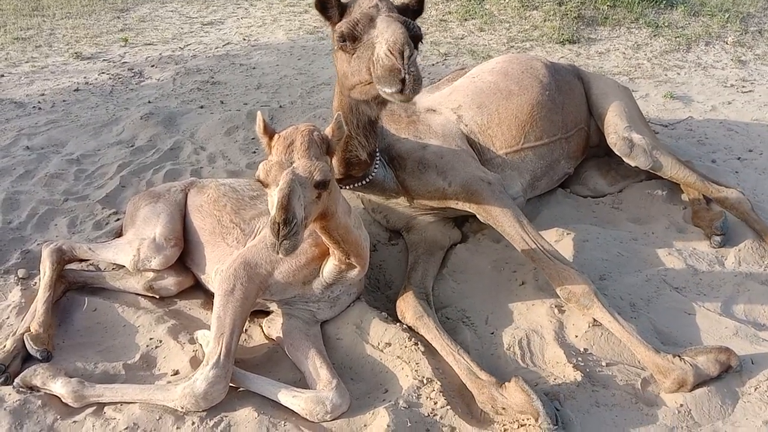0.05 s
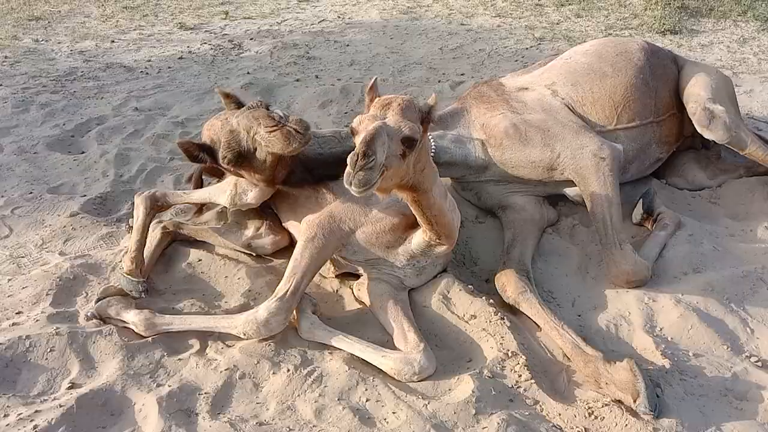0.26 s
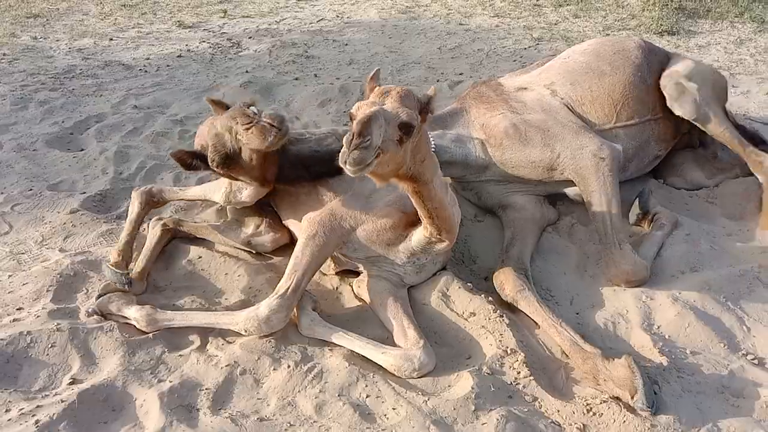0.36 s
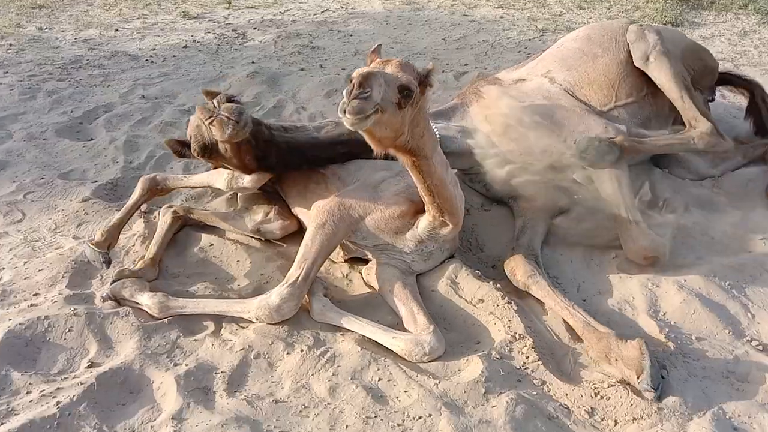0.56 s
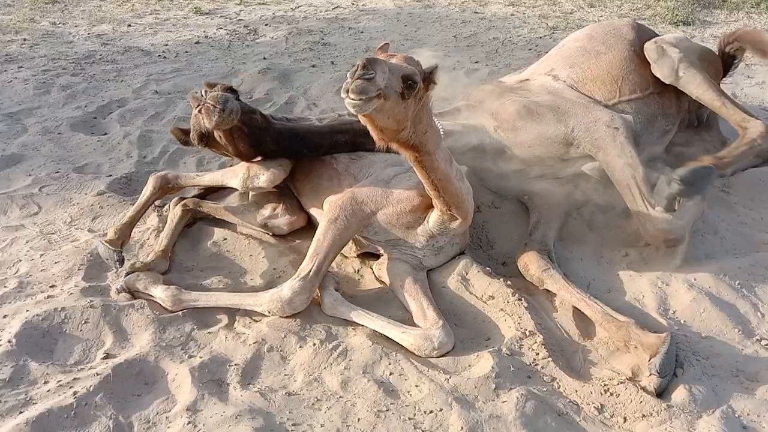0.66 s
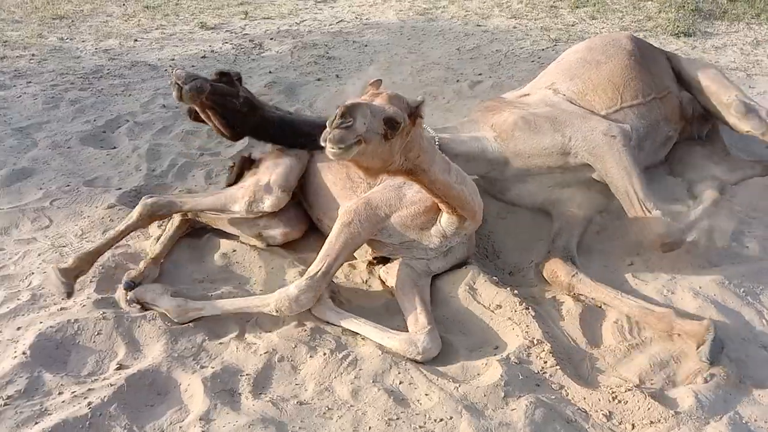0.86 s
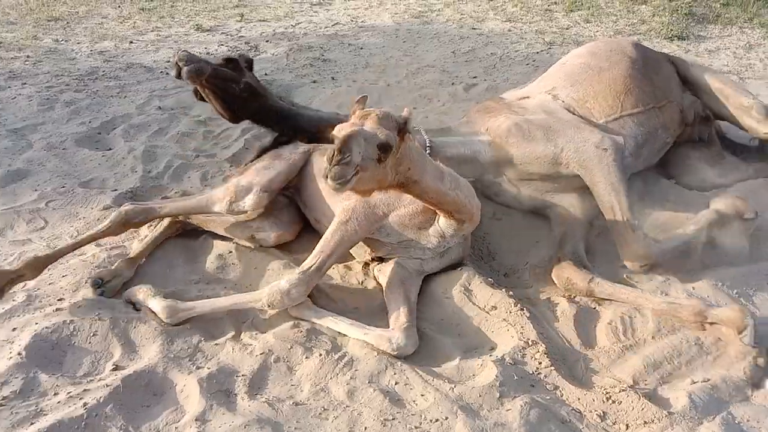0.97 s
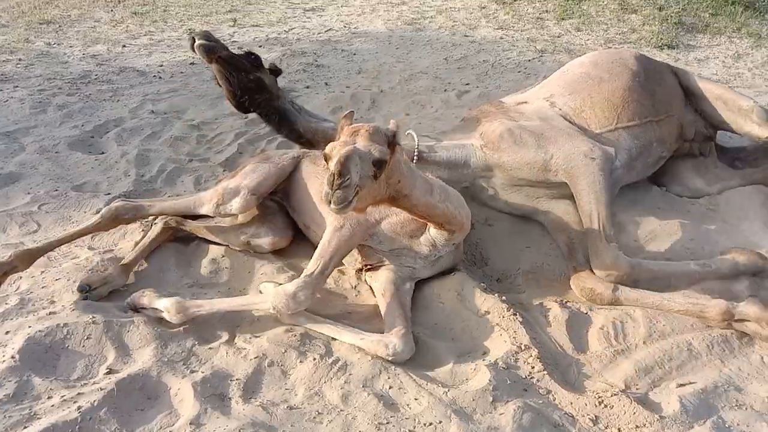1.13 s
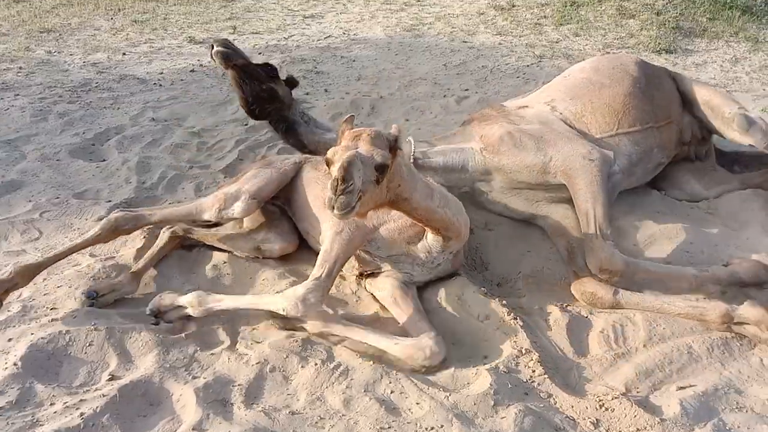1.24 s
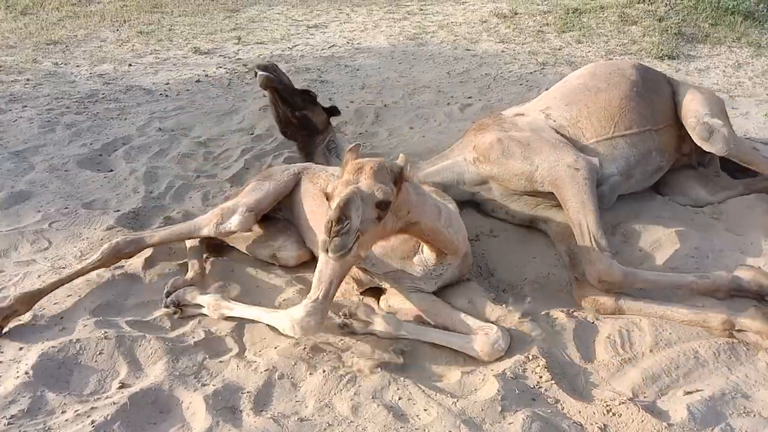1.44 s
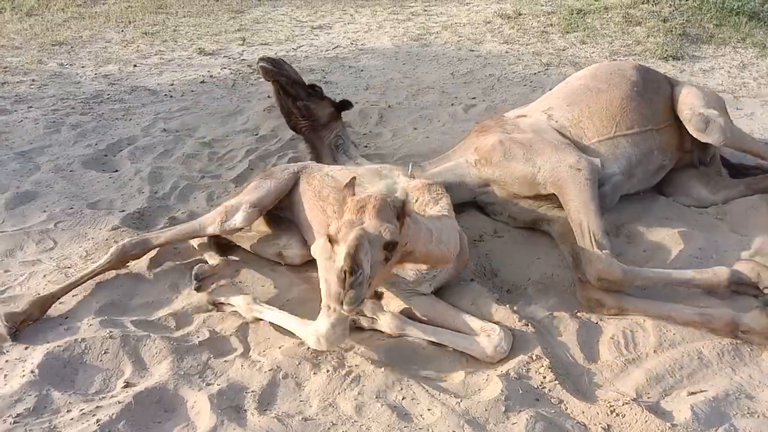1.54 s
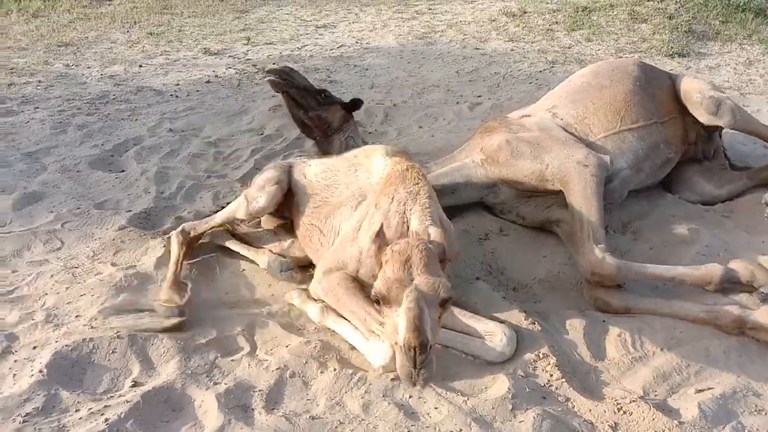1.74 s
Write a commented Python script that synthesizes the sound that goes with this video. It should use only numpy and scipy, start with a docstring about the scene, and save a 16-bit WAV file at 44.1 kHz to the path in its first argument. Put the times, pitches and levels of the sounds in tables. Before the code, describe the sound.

A camel gives three quick, hoarse grunts, the first two joined by a soft moan and the last the loudest. Its body and legs then thump dully on the ground, with light swishes of sand in quiet open air.

```python
"""On open sand, a rolling camel gives three hoarse grunts, the first two joined by a soft moan.
Its vocal folds (the flaps in its throat) chop the breath into uneven puffs, which ring in the
throat and mouth as a low voice and a bright rasp. Its body and legs thump and rumble on the ground,
its hide drags and kicked sand swishes. Faint chirps and a quiet hiss of air lie behind."""
import sys
import numpy as np
from scipy import signal
from scipy.fft import rfft, irfft, next_fast_len
from scipy.io import wavfile
from scipy.ndimage import uniform_filter1d, map_coordinates

SR = 44100
rng = np.random.default_rng(int(sys.argv[2]) if len(sys.argv) > 2 else 0)


def inscribe(sig):
    """Save sig as 16-bit PCM at rate SR to the path in sys.argv[1].

    A 1-D sig is mono; a 2-D sig holds one channel per row.
    Samples are clipped to [-1, 1] before scaling.
    """
    pcm = np.round(np.clip(np.atleast_2d(sig).T, -1, 1) * 32767)
    wavfile.write(sys.argv[1], SR, pcm.astype(np.int16))


N = 79380
T = np.arange(N) / SR
FFT_SIZE = next_fast_len(N + 8192, True)
HZ = np.fft.rfftfreq(FFT_SIZE, 1 / SR)


def grunts():
    """Puffs of breath ring a low throat and a bright, fluttering rasp, with a thin whistle."""
    # how the vocal folds vibrate (time [s], pitch [Hz], roughness [0-1])
    folds = [(0, 134.5, .7), (.2, 139.4, 0.7), (.3, 136.1, 1), (.355, 145.8, 0.47), (.38, 146.5, 0.34),
             (.42, 139.7, 0.37), (.45, 126.5, 0.47), (.52, 132, 0.7), (.565, 129.9, .4), (.68, 108.4, 0.53),
             (.76, 106.4, 0.67), (.82, 102.9, 0.57)]
    # loudness of the low voice and of the rasp (time [s], level [dB])
    throat_levels = [(.18, -81), (.196, -65), (.2, -35.5), (.27, -32.5), (.352, -31.5), (.375, -52),
                     (.425, -47.5), (.45, -31), (.515, -28), (.552, -30.5), (.568, -46), (.6, -83),
                     (.66, -66), (.675, -39.5), (.71, -25.5), (.752, -23.5), (.78, -23.5), (.8, -39),
                     (.82, -51.5), (.86, -64)]
    rasp_levels = [(.18, -90), (.197, -68), (.199, -38), (.26, -30), (.298, -33), (.31, -25.5),
                   (.335, -33.5), (.357, -35), (.38, -47.5), (.438, -46.5), (.447, -33.5), (.476, -30),
                   (.524, -33), (.542, -26), (.555, -32.5), (.575, -55.5), (.66, -77), (.672, -47),
                   (.675, -29.5), (.682, -43), (.692, -41), (.696, -25), (.71, -18.5), (.732, -20.5),
                   (.757, -17), (.781, -19), (.786, -25), (.801, -34), (.816, -41), (.835, -59.5),
                   (.95, -76), (1.1, -100)]
    # where grunts 1, 2 and 3 ring, low and high (frequency [Hz], width [Hz], level [dB])
    low_1 = [(297, 231, 9), (720, 170, -7.5), (890, 173, 8), (1123, 210, 1.5), (1460, 440, -9)]
    low_2 = [(246, 121, -0.5), (398, 105, -10), (705, 84, -11.5), (922, 144, 0.5), (1083, 150, -10.5),
             (1417, 260, -21)]
    low_3 = [(240, 60, -1.5), (326, 140, -7), (702, 140, -15.5), (973, 150, -1), (1122, 33, -11.5),
             (1259, 50, -9), (1463, 140, -19.5)]
    high_1 = [(1812, 51, -9.5), (2260, 336, -4.5), (2670, 130, -5), (3195, 630, -7.5), (4600, 320, -5),
              (5210, 420, -9.5), (5950, 320, -17), (6610, 440, -24)]
    high_2 = [(2110, 440, -14.5), (2607, 314, -2.5), (3178, 350, -3), (4265, 400, -13), (4370, 230, -14),
              (4830, 500, -14), (6060, 330, -21), (7000, 84, -29)]
    high_3 = [(2030, 150, -16.5), (2413, 272, 1.5), (2840, 300, -13), (3126, 180, -2.5), (3400, 160, -16),
              (4013, 280, -13.5), (4627, 510, -13.5), (5585, 440, -24.5), (6400, 450, -30),
              (7180, 890, -47.5)]
    top = [(8210, 900, -52), (9964, 620, -50)]  # weak treble rings shared by all three
    pitch, rough = curves(folds)
    puffs, bursts = fold_puffs(pitch, rough)
    throat = mouth(breath(puffs, bursts, noise_share=0.46 * rough), [low_1, low_2, low_3])
    throat *= amp(curves(throat_levels)[0])
    rasp_shapes = [list(rows) + list(top) for rows in (high_1, high_2, high_3)]
    rasp = mouth(breath(puffs, bursts, noise_share=1.5 * rough), rasp_shapes)
    flutter_db = 2.5 * rough * wobble(125.3)
    rasp *= amp(curves(rasp_levels)[0] + flutter_db)
    fade_out = np.clip((.95 - T) / 0.16, 0, 1)
    return (throat + whistle()) * fade_out + rasp


def fold_puffs(pitch, rough):
    """The folds let out one puff a cycle; a rougher voice has less even timing and strength."""
    starts = np.flatnonzero(np.diff(np.floor(np.cumsum(pitch) / SR)))
    chance = rng.standard_normal((len(starts), 2))
    slip = chance[:, 0] * .14 * rough[starts] * SR / pitch[starts]
    strength_db = 2 * rough[starts] * chance[:, 1]
    puffs = np.bincount(np.clip(starts + slip, 0, N - 1).astype(int), amp(strength_db), N)
    # each puff starts a burst that dies away over about one cycle
    bursts = signal.lfilter([1], [1, -np.exp(-0.98 * pitch.mean() / SR)], puffs)
    return puffs, bursts


def breath(puffs, bursts, noise_share):
    """Clean puffs mixed with the hiss of swirling air that follows each, plus close echoes."""
    share = np.clip(noise_share, 0, 1)
    hiss = unit(bursts * rng.standard_normal(N))
    return close_echoes(np.sqrt(1 - share) * unit(puffs) + np.sqrt(share) * hiss)


def mouth(source, shapes):
    """The mouth takes a new shape for each grunt, so different frequencies ring."""
    # moments when the mouth changes shape (time [s])
    changes = [0.414, .63]
    shape_now = sum(np.clip((T - s) / 0.045 + .5, 0, 1) for s in changes)
    out = np.zeros(N)
    for k, rows in enumerate(shapes):
        weight = np.clip(1 - np.abs(shape_now - k), 0, 1)
        out += weight * unit(filtered(source, resonances(rows)))
    return steady(out)


def whistle():
    """A thin, unsteady whistle in the throat during the last two grunts."""
    # path of the whistle (time [s], pitch [Hz], level [dB])
    path = [(.41, 1340, -89), (.445, 1350, -43), (.49, 1410, -53.5), (.53, 1452, -40), (.575, 1426, -49.5),
            (.61, 1400, -96.5), (.68, 1392, -71), (.76, 1495, -43.5), (.8, 1425, -44), (.84, 1410, -77.5)]
    hz, db = curves(path)
    level = np.sqrt(2) * amp(db + 3.4 * wobble(120))
    cycles = np.cumsum(hz * (1 + 0.0031 * wobble(150))) / SR
    return level * np.sin(2 * np.pi * cycles)


def moan():
    """A soft, clean voice made of harmonics: tones at 1, 2, 3... times the pitch."""
    # path of the moan (time [s], pitch [Hz], level [dB])
    path = [(.29, 149.6, -55), (.345, 149.9, -38.5), (.38, 146.6, -39), (.405, 144.6, -44),
            (.425, 137, -42.5), (.45, 132, -53), (.48, 131, -74)]
    # strength of each harmonic, lowest first (relative level [dB])
    harmonics = [-14.5, -7.5, -18, -45, -16, -3, -10.5, -15, -23, -29]
    hz, db = curves(path)
    cycles = np.cumsum(hz) / SR
    tone = sum(amp(level) * np.sin(2 * np.pi * (k * cycles + rng.random()))
               for k, level in enumerate(harmonics, 1))
    return unit(tone) * amp(db) * (T > path[0][0]) * (T < path[-1][0])


def squeal(width_hz=950):
    """Swirling air rings brightly in the first grunt and falls in pitch as the mouth opens."""
    # path of the ring (time [s], frequency [Hz], level [dB])
    path = [(.197, 6000, -58), (.2, 6000, -52), (.222, 5900, -42), (.24, 5250, -40.5), (.26, 4510, -31),
            (.29, 4420, -42), (.325, 4460, -30.5), (.36, 4250, -73), (.38, 4350, -78)]
    hz, db = curves(path)
    band = wobble(width_hz) + 1j * wobble(width_hz)
    hiss = np.real(band * np.exp(2j * np.pi * np.cumsum(hz) / SR))  # moves the noise up to hz
    return steady(hiss) * amp(db) * (T > path[0][0]) * (T < path[-1][0])


def whine():
    """Thin air rings faintly in the throat before the first grunt."""
    # loudness of the whine (time [s], level [dB])
    levels = [(0, -75), (.04, -55.5), (.09, -65.5), (.135, -55.5), (.19, -63.5), (.23, -90)]
    # where the throat rings (frequency [Hz], width [Hz], level [dB])
    rings = [(950, 89, 1), (2600, 300, -17), (3320, 480, -28), (4850, 290, -31), (5500, 300, -34)]
    return steady(noise(resonances(rings))) * amp(curves(levels)[0])


def body():
    """The shifting body makes the ground rumble and lands in heavy bumps a cycle or two long."""
    # tone of the ground (frequency [Hz], relative level [dB])
    ground = [(20, -20), (45, -15), (75, 7), (150, -2), (230, -8.5), (350, -21), (500, -40.5), (750, -50.5),
              (1400, -61), (4000, -89)]
    # loudness of the rumble (time [s], level [dB])
    rumble = [(0, -56), (.09, -39.5), (.25, -47), (.33, -36.5), (.42, -56), (.56, -51), (.6, -41),
              (.75, -36), (.82, -40.5), (.97, -43), (1.08, -34), (1.15, -44), (1.24, -28), (1.31, -32.5),
              (1.45, -32), (1.52, -35), (1.6, -25.5), (1.665, -45)]
    # body and legs hitting the ground (time [s], level [dB], pitch [Hz])
    thumps = [(0.101, -38, 69), (0.161, -34.5, 79.5), (0.296, -22, 136), (0.686, -16.5, 138),
              (0.915, -18, 107), (0.932, -25, 188), (1.025, -21.5, 156.4), (1.093, -20.5, 178.4),
              (1.114, -23.5, 70), (1.238, -23, 165), (1.254, -22.5, 127.7), (1.335, -13, 171),
              (1.35, -23, 155), (1.411, -18.5, 130), (1.423, -14.5, 107), (1.464, -17, 143.5),
              (1.486, -20.5, 111), (1.555, -22, 133), (1.587, -21.5, 188.5), (1.609, -29, 130)]
    rise_cycles, fall_cycles = 0.44, 0.58
    out = steady(noise(colour(ground))) * amp(curves(rumble)[0] + 1.5 * wobble(30))
    for s, db, hz in thumps:
        cycles = (T - s) * hz
        bump = np.exp(-.5 * (cycles / np.where(cycles < 0, rise_cycles, fall_cycles)) ** 2)
        overtone = amp(-13) * bump ** 2 * np.cos(2 * np.pi * (1.91 * cycles + rng.random()))
        out += amp(db) * (bump * np.cos(2 * np.pi * cycles) + overtone)
    return out


def hide_drags():
    """The camel's skin drags on the sand in short, dull rubs."""
    # each rub (time [s], width [s], level [dB])
    rubs = [(.14, 0.014, -49), (0.934, 0.0099, -43), (1.1, .022, -55), (1.201, 0.011, -45),
            (1.255, 0.028, -41.5), (1.335, 0.0089, -24), (1.365, 0.014, -45.5), (1.474, 0.026, -47),
            (1.595, 0.023, -43)]
    # tone of the rubbing (frequency [Hz], relative level [dB])
    tone = [(120, -19.5), (260, 3.5), (380, 0), (520, -10), (700, -28), (1100, -50.5), (2000, -73.5)]
    return steady(noise(colour(tone))) * sum(amp(db) * swell(s, width) for s, width, db in rubs)


def sand_swishes():
    """Kicked sand flies in swells of grainy hiss."""
    # each swish (time [s], width [s], level [dB], treble tilt [dB per octave])
    swishes = [(.298, 0.01, -55.5, 0), (.33, 0.015, -53, 2.5), (0.603, 0.015, -44.5, 0.5),
               (.645, 0.024, -65, 4), (.755, 0.076, -52.5, -6), (.895, 0.028, -63.5, 2),
               (.973, 0.0054, -52, 2), (.988, 0.041, -58.5, -4.5), (1.06, 0.034, -56.5, -13.5),
               (1.479, .012, -64, 2)]
    # tone of the sand (frequency [Hz], relative level [dB])
    tone = [(300, -25), (900, -10), (2500, -3), (4200, -7.5), (6300, 5), (8000, -9), (10000, -7),
            (11500, -11.5), (14500, -4.5), (16000, -10)]
    out = np.zeros(N)
    for s, width, db, tilt in swishes:
        hiss = noise(colour(tone) * amp(tilt * np.log2(HZ / 4000 + 0.037)))
        grains = unit(hiss * amp(2.5 * wobble(900)))  # a fast flicker makes it grainy
        out += grains * amp(db) * swell(s, width)
    return out


def knocks():
    """Small, dry knocks and scuffs: noise that starts sharply and dies away."""
    # each knock (time [s], level [dB], frequency [Hz], width [octaves], decay [s])
    hits = [(0.024, -49.5, 1900, 0.69, 0.0013), (.982, -43, 782, 0.71, 0.0069),
            (1.005, -55, 1300, 0.26, 0.031), (1.321, -50, 896, .2, 0.0065),
            (1.333, -36.5, 640, 0.24, 0.011), (1.39, -65, 787, 0.055, 0.036),
            (1.412, -66, 2780, 0.585, 0.0078), (1.554, -47.5, 1680, 0.34, 0.0038),
            (1.555, -51, 997, 0.089, 0.0083)]
    out = np.zeros(N)
    for s, db, hz, octaves, decay in hits:
        band = np.exp(-.5 * (np.log2((HZ + 1) / hz) / octaves) ** 2)
        rise = np.clip((T - s) / decay * 5, 0, 1)
        out += noise(band) * amp(db) * rise * np.exp(-np.abs(T - s) / decay)
    return out


def sand_ticks():
    """Single grains of sand make tiny, bright ticks."""
    # each grain (time [s], level [dB])
    grains = [(1.038, -67), (1.06, -64), (1.07, -66), (1.088, -68.5), (1.1, -60.5), (1.14, -71.5),
              (1.337, -60.5), (1.432, -63.5)]
    return noise(HZ > 3000) * sum(amp(db) * swell(s, width_s=0.00068) for s, db in grains)


def far_chirps():
    """Faint, far chirps: brief high tones that waver a little."""
    # each chirp (time [s], width [s], pitch [Hz], level [dB])
    chirps = [(0.155, 0.0052, 6460, -64), (1.072, 0.015, 3320, -65), (1.225, 0.0076, 3160, -68.5),
              (1.246, .014, 2370, -67.5)]
    return sum(amp(db) * swell(s, width) * np.sin(2 * np.pi * hz * T + .5 * wobble(300))
               for s, width, hz, db in chirps)


def open_air():
    """A very quiet hiss of air whose level sways."""
    # tone of the air (frequency [Hz], relative level [dB])
    tone = [(30, 1), (300, -6), (900, -7), (1450, -2.5), (2200, -10.5), (3200, -10), (4500, -15.5),
            (7000, -17), (8200, -8.5), (9200, -17.5), (10200, -9), (11500, -26), (16000, -24.5)]
    return amp(-74 + 1.5 * wobble(15)) * noise(colour(tone))


def close_echoes(x, decay_s=0.0061):
    """Adds a few milliseconds of shifting echoes off the ground and bodies close by."""
    tails = rng.standard_normal((3, 2000)) * np.exp(-T[:2000] / decay_s)
    echoes = signal.fftconvolve(x[None], tails / np.linalg.norm(tails[0]), axes=1)[:, :N]
    return x + amp(-0.5) * unit(sum(echo * wobble(24.81) for echo in echoes))


def resonances(rows):
    """A filter that rings at each row's frequency, as a hollow space does."""
    power = sum(amp(db) ** 2 / (1 + np.abs(2 * (HZ - hz) / width) ** 5) for hz, width, db in rows)
    cepstrum = irfft(np.log(power + 1e-10) / 2, FFT_SIZE)
    # keeping only the first half makes the ringing follow a puff, never lead it
    cepstrum[1:FFT_SIZE // 2] *= 2
    cepstrum[FFT_SIZE // 2 + 1:] = 0
    return np.exp(rfft(cepstrum))


def amp(db):
    """Turns decibels into a gain to multiply by."""
    return 10 ** (np.asarray(db) / 20)


def unit(x):
    """Scales x to an overall level of 1."""
    return x / np.sqrt(np.mean(x ** 2) + 1e-20)


def steady(x):
    """Evens x out so that its level stays near 1."""
    power = uniform_filter1d(uniform_filter1d(x ** 2, size=700), size=500)
    return x / np.sqrt(np.abs(power) + 1e-12)


def curves(rows):
    """One value per sample for each column after the time."""
    times, *columns = np.transpose(rows)
    return [np.interp(T, times, column) for column in columns]


def swell(peak_s, width_s):
    """A smooth rise and fall."""
    return np.exp(-((T - peak_s) / width_s) ** 2)


def wobble(rate):
    """A smooth curve through `rate` random values a second."""
    return map_coordinates(rng.standard_normal(2000), [T * rate], mode="wrap")


def colour(points):
    """A gain for every frequency, drawn through (Hz, dB) points."""
    hz, db = np.transpose(points)
    return amp(np.interp(np.log(HZ + 1), np.log(hz), db))


def filtered(x, gain):
    """Turns each frequency of x up or down by its gain."""
    return irfft(rfft(x, FFT_SIZE) * gain, FFT_SIZE)[:N]


def noise(gain):
    """Filtered noise at a level of 1."""
    return unit(filtered(rng.standard_normal(N), gain))


def scene():
    """The camel's voice, its rolling and the background, in one channel."""
    voice = whine() + grunts() + moan() + squeal()
    rolling = body() + sand_swishes() + knocks() + hide_drags() + sand_ticks()
    return (voice + rolling + far_chirps() + open_air())[None]


def record(dry):
    """Stops the sound shortly before the end and cuts the very highest treble."""
    end_s, top_hz = 1.669, 15700
    fade_out = np.clip((end_s - T) / 0.0047, 0, 1)
    return filtered(dry[0] * fade_out, HZ < top_hz)[None]


dry = scene()
out = record(dry)
inscribe(out)
```